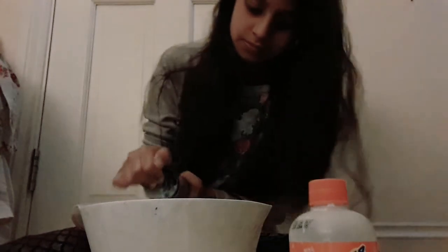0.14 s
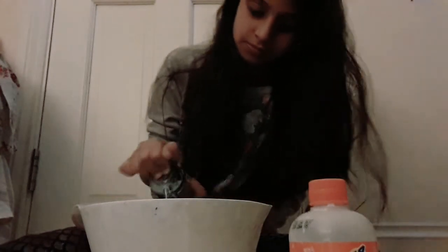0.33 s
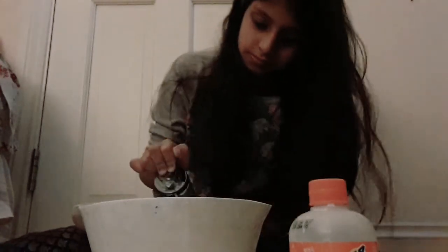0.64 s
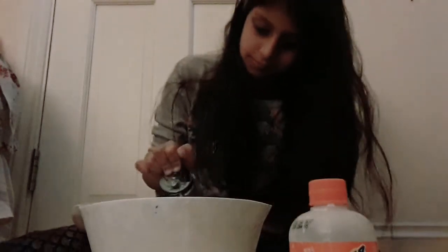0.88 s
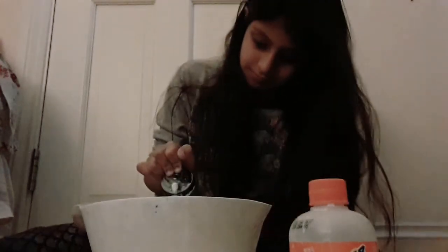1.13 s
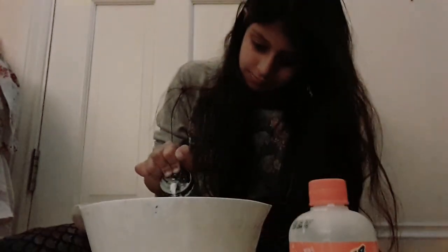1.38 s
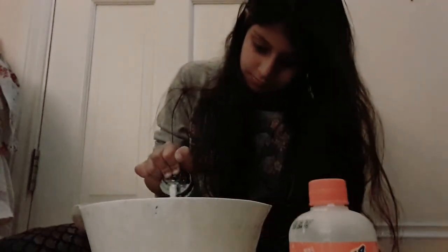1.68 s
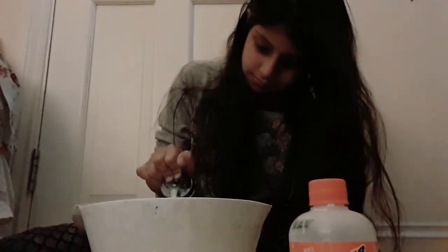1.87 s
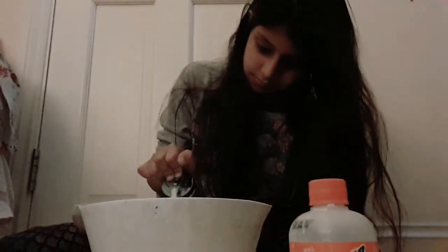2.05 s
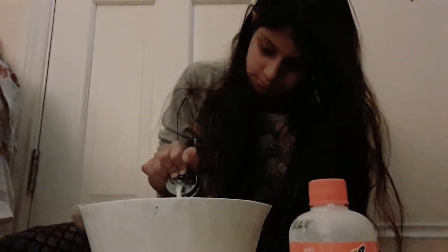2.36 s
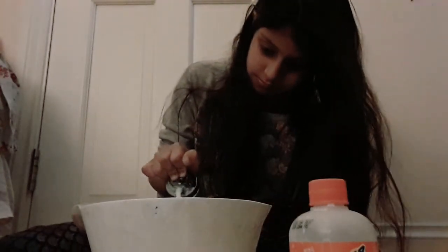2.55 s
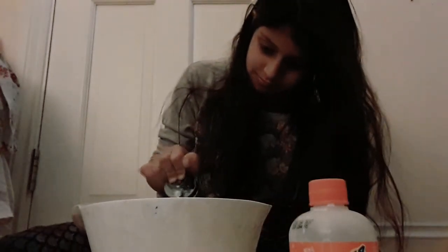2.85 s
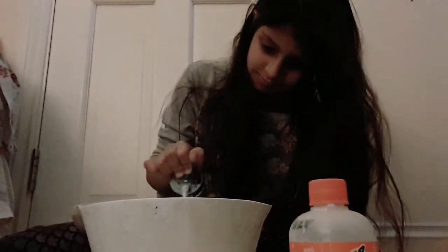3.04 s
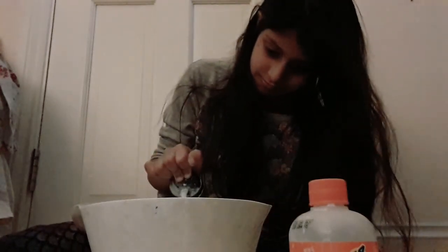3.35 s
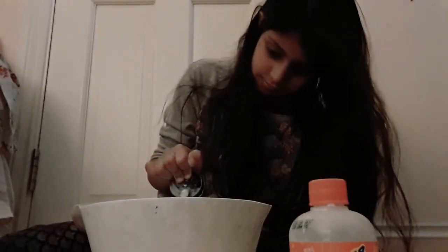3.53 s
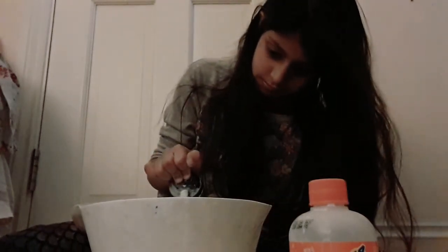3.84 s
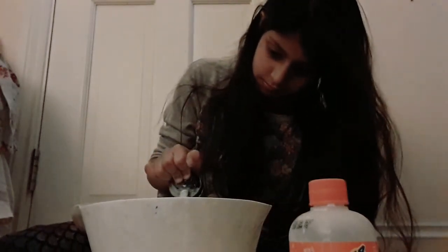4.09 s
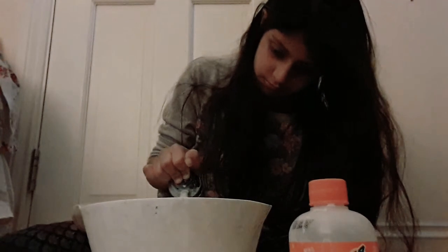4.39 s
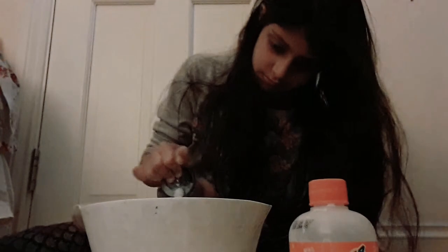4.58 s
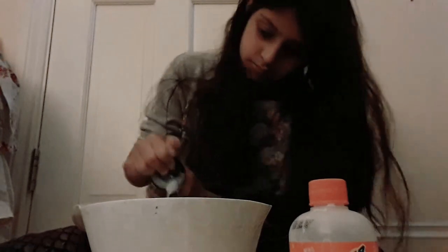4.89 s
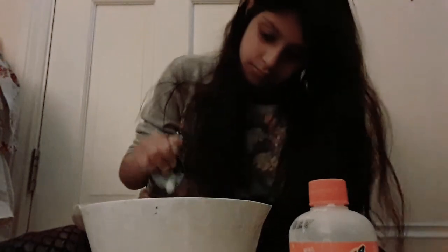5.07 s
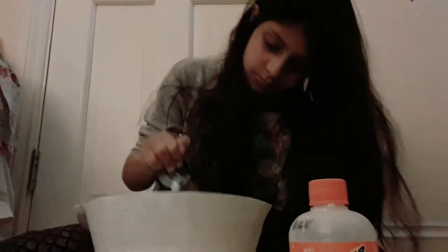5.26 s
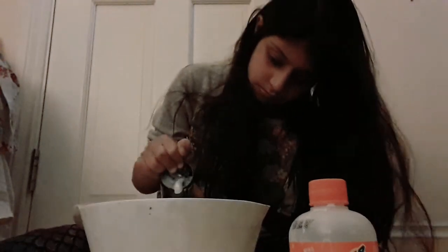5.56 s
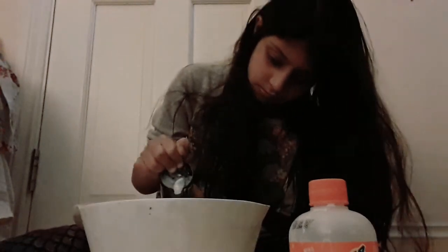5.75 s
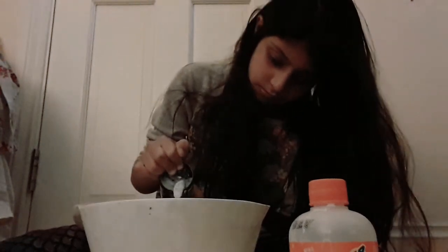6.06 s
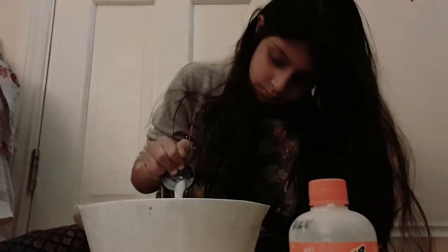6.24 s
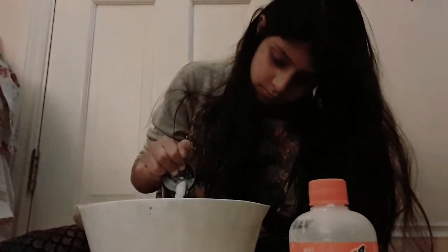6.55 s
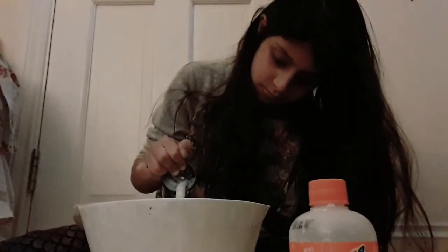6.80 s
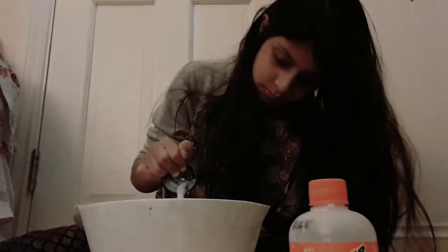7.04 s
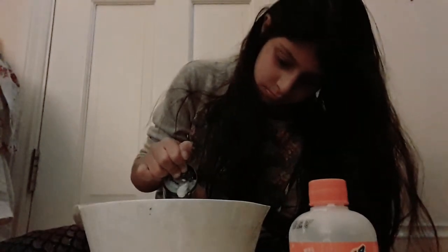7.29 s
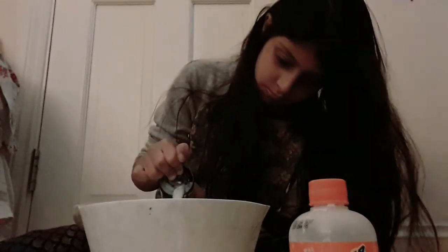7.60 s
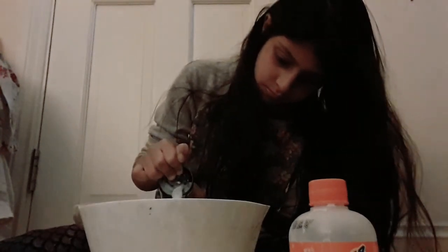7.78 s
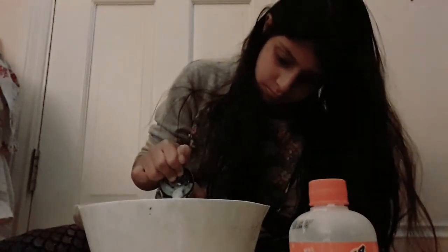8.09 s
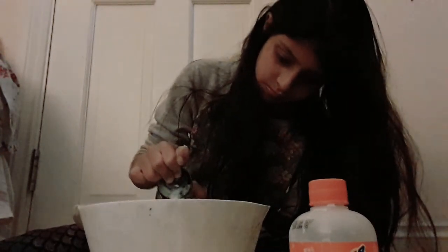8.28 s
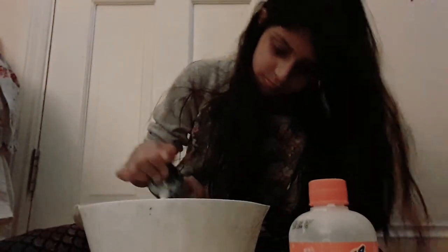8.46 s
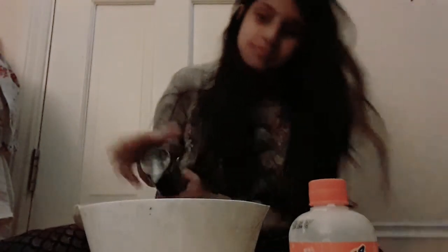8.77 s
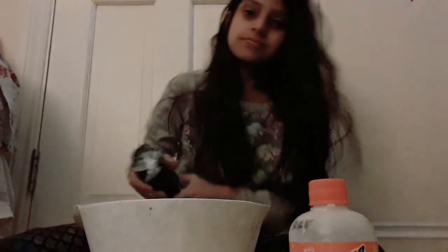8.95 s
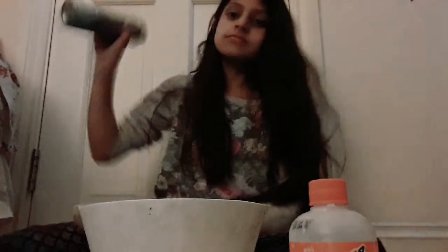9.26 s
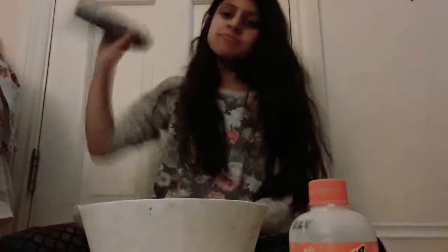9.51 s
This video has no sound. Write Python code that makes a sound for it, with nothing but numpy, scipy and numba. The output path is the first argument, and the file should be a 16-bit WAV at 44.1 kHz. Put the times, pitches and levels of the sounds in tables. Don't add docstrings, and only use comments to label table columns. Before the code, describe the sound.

A nearly empty foam can sputters over a plastic bowl, about an arm's length from a small microphone in a close room. A short hissy spurt ends, then a long rough burst grows gassier. After a pause, hesitant pops build into another spurt, followed by quick taps, tiny dribbling ticks and a last strong burst. Faint cloth rustle and low room rumble remain.

```python
import sys
import numpy as np
from scipy import signal
from scipy.fft import rfft, irfft
from scipy.io import wavfile
from scipy.ndimage import uniform_filter1d
from numba import njit

SR = 44100
rng = np.random.default_rng(int(sys.argv[2]) if len(sys.argv) > 2 else 0)


def field_ratio(decibels):
    return 10 ** (np.asarray(decibels, dtype=float) / 20)


def dump(signal):
    limited = np.clip(np.atleast_2d(signal).T, -1, 1)
    pcm = np.round(limited * 32767).astype(np.int16)
    wavfile.write(sys.argv[1], SR, pcm)


N = 424683


def level(x, db=0):
    return x * field_ratio(db) / np.sqrt(np.mean(x ** 2))


def band(x, lo_hz, hi_hz, order=2):
    edges_hz = [lo_hz, min(hi_hz, .49 * SR)]
    return signal.sosfilt(signal.butter(order, edges_hz, "band", fs=SR, output="sos"), x)


def fade(x, tau_s):
    return signal.lfilter([1], [1, -np.exp(-1 / (tau_s * SR))], x)


def walk(rate):
    hold = int(SR / rate)
    steps = np.repeat(rng.standard_normal(N // hold + 1), hold)
    return uniform_filter1d(steps, hold)[:N]


def add(out, s, x):
    i = int(s * SR)
    out[i:i + len(x)] += x[:len(out) - i]


def law(share_db, base_db, slope):
    return base_db + slope * share_db


def valve():
    # t/s, foam flow level/dB, gas share level/dB, spout f/Hz
    press_end = [(0.0, -32.5, 11.5, 3250), (0.03, -34, 11.5, 3200), (0.2, -34, 11, 3310)]
    press_blip = [
        (0.63, -74.5, 16.4, 2944),
        (0.668, -50, 15.7, 3060),
        (0.7, -42, 14, 3397),
        (0.76, -65.5, 12, 3980),
    ]
    press_long = [(.79, -44.5, -12, 3080), (.85, -29.5, -11, 3770), (.97, -29, -5.5, 3490),
                  (1.269, -27.5, -2, 3656), (1.53, -27.5, -3.5, 3328), (1.63, -24, 1.5, 4270),
                  (1.69, -28.5, 9.5, 3513), (2.0, -31, 12.5, 3700), (2.471, -32, 11.5, 3620)]
    press_slow = [(2.975, -52, -9.5, 3278), (3.02, -42.5, 9.5, 3793), (3.1, -52.5, 10.5, 3700),
                  (3.2, -53, 2.5, 2825), (3.6, -50.5, -5, 2814), (3.85, -47, -5, 3414),
                  (4.201, -39, -2.5, 3350), (4.53, -28.5, 3.5, 3707), (4.66, -41.5, 13, 3235)]
    press_taps = [(5.37, -66, -14, 3100), (5.396, -48, -37, 3140), (5.458, -65.5, -17.5, 3280),
                  (5.464, -45.5, -32, 3377), (5.5, -45.5, 7.5, 3740), (5.562, -64, 0.5, 3649),
                  (5.568, -42, -3.5, 3540), (5.61, -55.5, 17, 3310)]
    press_dribble = [(5.761, -79.5, 8.5, 3000), (6.0, -78.5, 7, 2897), (6.38, -70.5, -5.5, 3000),
                     (6.45, -74.5, -12.5, 3020), (6.66, -71.5, 7, 2860), (6.72, -85.5, 7.5, 2940),
                     (6.95, -83.5, -0.5, 2985)]
    press_last = [(6.97, -79.5, 9, 3020), (7.158, -59, 0, 2939), (7.412, -41.5, -2.5, 3000),
                  (7.52, -34, -11, 3850), (7.535, -28.5, 0, 4170), (7.689, -33, 10.5, 3136),
                  (7.868, -32.5, 11, 3300), (7.97, -40, 14, 2347)]
    jet_aims = [
        11.5,
        -5,
        -0.5,
        -4.5,
        -8.5,
        -3,
        6,
    ]
    open_db_per_s, shut_db_per_s = 1196.5, 295
    settle_db, settle_db_per_s = -37, 62.5
    t = np.arange(N) / SR
    controls = np.array([[-200], [0], [3000], [0], [0]]) * np.ones(N)
    presses = (press_end, press_blip, press_long, press_slow, press_taps, press_dribble, press_last)
    for press, aim_db in zip(presses, jet_aims):
        s, *columns = np.transpose(press)
        curves = [np.interp(t, s, column) for column in columns]
        now = np.array(curves + [np.full(N, aim_db), curves[0]])
        shut_s = np.maximum(t - s[-1], 0)
        now[0] -= open_db_per_s * np.maximum(s[0] - t, 0)
        now[0] -= np.minimum(shut_db_per_s * shut_s, settle_db_per_s * shut_s - settle_db)
        controls = np.where(now[0] > controls[0], now, controls)
    return controls


@njit
def svf(x, hz, q):
    y, b, l = np.empty(len(x)), 0., 0.
    for i in range(len(x)):
        g = np.tan(np.pi * hz[i] / SR)
        v = (b + g * (x[i] - l)) / (1 + g * (g + 1 / q))
        b, l, y[i] = 2 * v - b, l + 2 * g * v, v / q
    return y


def foam_top(x):
    return signal.sosfilt(signal.butter(4, 9070, fs=SR, output="sos"), x)


def path(x):
    # f/Hz, width f/Hz, level/dB
    resonances = [(320, 200, 10), (430, 77, -10), (540, 110, 9.5), (589, 130, 8.5), (900.28, 640, -15),
                  (1295, 89, 8.5), (2099, 160, 10.5), (2560, 130, -2.5), (2900, 300, 8), (3550, 570, -1),
                  (4400, 200, 0), (5300, 500, -1), (8560, 430, 2), (8440, 2600, 13.5)]
    for hz, width, db in resonances:
        w, a = 2 * np.pi * hz / SR, field_ratio(db / 2)
        k = np.sin(w) * width / hz / 2
        middle = -2 * np.cos(w)
        x = signal.lfilter([1 + k * a, middle, 1 - k * a], [1 + k / a, middle, 1 - k / a], x)
    return x


def sputter(spout_db, share_db, spout_hz, aim_db, held_db):
    full_flow_db, pops_per_s, pop_scatter_db = -30, 600, 6.5
    below_db = np.clip(full_flow_db - held_db, 0, 40)
    thin = field_ratio(-.35 * below_db)
    burst = rng.random(N) < pops_per_s * thin * field_ratio(1.8 * walk(60)) / SR
    scatter = np.minimum(rng.exponential(size=N), 1.8)
    size = burst * field_ratio(pop_scatter_db * scatter) / np.sqrt(thin)
    pops = level(size * rng.choice([-1., 1.], N))
    puffs = level(fade(size, 0.0022))
    noise = rng.standard_normal((4, N))

    wobble_hz = np.clip(spout_hz * (1 + 0.06 * walk(60)), 500., 9000.)
    drive = pops + 0.61 * noise[0] * (0.51 + puffs)
    ringing = level(svf(svf(drive, wobble_hz, 3.), wobble_hz, 3.))
    spread_db = .3 * below_db + .4 * np.maximum(share_db, 0) - 6
    spout = foam_top(ringing + field_ratio(spread_db) * level(band(drive, 1100, 4500)))

    clicks = .4 * thin * pops
    gas = foam_top(band(noise[1] * (0.72 + puffs) * field_ratio(0.76 * walk(25)) + clicks, 5200, 8800))
    jet = band(noise[2] * (0.82 + puffs) * field_ratio(2.1 * walk(17)) + clicks, 9800, 15000, order=3)
    boom = band(noise[3] * (8.7 + puffs), 160, 1900)
    bowl = band(noise[3] * (1.8 + puffs), 1950, 3100)
    layers = [(spout, 0),
              (bowl, law(share_db, -16.5, 0.53)),
              (gas, law(share_db, -4.5, 1.1)),
              (jet, law(share_db, -32.5, 2.35) + aim_db),
              (boom, law(share_db, -21.5, 0.42) + 0.54 * below_db)]
    return sum(level(path(x)) * field_ratio(spout_db + db - 0.5) for x, db in layers)


def swell(hz):
    rise_s = 0.0033 * (3000 / hz) ** 3
    t = np.arange(int(.02 * SR)) / SR
    rise = np.sin(np.pi / 2 * np.minimum(t / rise_s, 1)) ** 2
    return t, rise * np.exp(-np.maximum(t - rise_s, 0) / 0.0018)


def spits(share_db):
    # t/s, peak level/dB, ring f/Hz
    spits_long = [(0.849, -14.5, 3620), (0.9184, -25, 3700), (0.9839, -16.5, 3720), (1.0014, -17.5, 3210),
                  (1.0179, -16.5, 3350), (1.0459, -12.5, 3480), (1.0752, -13, 3480), (1.1505, -14, 3670),
                  (1.173, -21.5, 3290), (1.224, -20.5, 3320), (1.2368, -16.5, 3600), (1.4204, -13.5, 3420),
                  (1.4638, -14, 3340), (1.5044, -18.5, 3010), (1.6291, -10, 4430), (1.6929, -17, 3460),
                  (1.7327, -17, 3290), (1.7487, -13.5, 4150), (1.7688, -16, 4870), (1.801, -19, 3250),
                  (1.9492, -19.5, 4890), (1.9634, -12.5, 3770), (1.9837, -10.5, 3880),
                  (2.0016, -17.5, 3460), (2.1036, -12, 3680), (2.1697, -14, 4100), (2.281, -17, 3690),
                  (2.3213, -17, 3620), (2.3777, -19.5, 3890), (2.4416, -18.5, 3140)]
    spits_slow = [(2.977, -39, 3470), (2.98, -33.5, 2910), (3.0063, -23, 3660), (3.061, -23.5, 4890),
                  (3.115, -32, 3770), (3.144, -33, 2730), (3.193, -31.5, 4860), (3.2279, -25.5, 3225),
                  (3.2459, -19, 2940), (3.2954, -30, 2980), (3.3206, -30.5, 2750), (3.3636, -33.5, 2950),
                  (3.497, -31.5, 2900), (3.64, -32, 2797), (3.746, -29, 2970), (3.8464, -24.5, 3260),
                  (3.9518, -25, 4640), (4.0912, -15, 4770), (4.143, -21, 2870), (4.192, -18, 3660),
                  (4.2866, -12.5, 3690), (4.3207, -15, 3740), (4.3596, -33, 3820), (4.3819, -15.5, 2860),
                  (4.4268, -16, 3615), (4.505, -17.5, 2875), (4.5453, -10.5, 4000), (4.563, -15.5, 3610),
                  (4.618, -16.5, 2855), (4.653, -23.5, 3130)]
    spits_dribble = [(5.3693, -61, 2900), (5.378, -53.5, 3360), (5.3917, -32.5, 3200), (5.439, -40, 3000),
                     (5.4664, -28, 3210), (5.496, -28.5, 4580), (5.5708, -31.5, 3020),
                     (5.8741, -64.5, 2810), (5.9528, -61.5, 3000), (5.9714, -53, 2820), (6.05, -51.5, 2930),
                     (6.083, -46.5, 2880), (6.162, -43, 2870), (6.2264, -57, 2800), (6.2627, -51, 3110),
                     (6.2885, -47, 3130), (6.335, -66, 3000), (6.36, -38, 3030), (6.386, -40, 3090),
                     (6.4555, -56, 2880), (6.5812, -60, 2880), (6.6177, -53.5, 2830)]
    spits_last = [(6.958, -70, 2860), (6.9823, -59, 2970), (6.9986, -52, 3020), (7.0185, -67, 2760),
                  (7.0501, -64, 2880), (7.071, -48.5, 3100), (7.093, -48, 3060), (7.122, -39.5, 2970),
                  (7.143, -45, 3000), (7.1631, -28, 2940), (7.199, -35.5, 3120), (7.2478, -32, 2980),
                  (7.269, -35, 2940), (7.293, -34, 2860), (7.307, -31, 2930), (7.336, -34.5, 2950),
                  (7.337, -30, 3000), (7.362, -28, 3080), (7.3735, -29, 2950), (7.3876, -32, 2900),
                  (7.4066, -33, 3040), (7.4162, -25, 4360), (7.4414, -19, 3000), (7.4774, -23, 4100),
                  (7.5051, -26, 4340), (7.5299, -25, 4080)]
    spits_full = [(7.5294, -16, 4170), (7.614, -17.5, 2890), (7.6401, -12.5, 4260), (7.666, -23, 2890),
                  (7.7083, -24, 2980), (7.7292, -17, 3004), (7.7886, -14.5, 4530), (7.8592, -13, 4430),
                  (7.913, -32.5, 2916)]
    spits_small = [(3.3428, -38, 2780), (3.3917, -31, 2800), (3.4376, -54, 2830), (3.4595, -52, 2940),
                   (3.4765, -45, 2790), (3.5389, -38, 2920), (3.5638, -36, 2990), (3.6207, -49, 2800),
                   (3.696, -47, 2860), (3.7179, -46, 3470), (3.7594, -30, 3720), (3.7818, -34, 3720),
                   (3.8806, -26, 3400), (3.8985, -40, 3600), (3.916, -45, 3140), (3.9429, -36, 2900),
                   (3.9644, -23.5, 3020), (3.9833, -34, 2860), (3.9993, -25, 3100), (4.0467, -29.5, 3060)]
    spits_early = [(1.271, -13.5, 3390), (1.3528, -22.5, 3190), (1.3656, -22.5, 3300),
                   (1.5198, -16.5, 2910), (1.5782, -14, 3860), (1.6106, -9.5, 4470)]
    spits_late = [(7.5601, -12.5, 4490), (7.5913, -17, 2933), (7.7684, -20.5, 2920), (7.8117, -20, 2980),
                  (7.865, -20, 2888)]
    # t/s, peak level/dB
    gusts_sharp = [(0.8533, -13.5), (1.0189, -21), (1.044, -13.5), (1.0799, -13.5), (1.3187, -6),
                   (1.3307, -6), (1.3542, -14.5), (3.014, -30), (3.0641, -13.5), (3.2444, -39),
                   (3.9988, -21.5), (4.039, -26), (4.0909, -21.5), (4.1487, -20.5), (4.1934, -14),
                   (5.497, -42), (5.573, -35), (5.6032, -23.5), (6.999, -46.5), (7.1616, -36),
                   (7.2963, -32.5), (7.3493, -31)]
    # t/s, peak level/dB
    gusts_end = [(0.0358, -11.5), (0.0962, -9.5), (0.1186, -11), (0.1361, -10), (0.178, -13.5),
                 (0.2024, -12.5)]
    gusts_long = [(1.4083, -24.5), (1.4208, -19.5), (1.4547, -21), (1.4667, -17), (1.5051, -17),
                  (1.5191, -12.5), (1.539, -15), (1.5535, -13.5), (1.5705, -14), (1.5964, -11.5),
                  (1.6169, -8.5), (1.6473, -10.5), (1.6623, -10.5), (1.7321, -7), (1.7521, -9.5),
                  (1.7825, -6.5), (1.8019, -8), (1.8488, -4.5), (1.8678, -5.5), (1.8763, -4.5),
                  (1.9117, -6.5), (1.9676, -9), (1.988, -8), (2.002, -4.5), (2.0384, -6), (2.0648, -6),
                  (2.0873, -5), (2.1277, -6), (2.1462, -5.5), (2.1801, -11.5), (2.203, -7), (2.236, -9.5),
                  (2.2479, -9.5), (2.2814, -8.5), (2.3188, -4.5), (2.3442, -8), (2.3851, -10.5),
                  (2.4026, -10), (2.443, -7.5), (2.4649, -1.5)]
    gusts_slow = [(4.2438, -27.5), (4.2902, -24), (4.3146, -26), (4.3391, -18.5), (4.3515, -14),
                  (4.4044, -19.5), (4.4214, -20), (4.4403, -20.5), (4.4618, -12), (4.4877, -15),
                  (4.5132, -12.5), (4.5496, -15.5), (4.6274, -12), (4.6578, -14.5)]
    gusts_last = [(7.5044, -39), (7.5313, -22.5), (7.5425, -26), (7.5637, -19.5), (7.5827, -14.5),
                  (7.6256, -8.5), (7.648, -13.5), (7.6615, -13), (7.6874, -12.5), (7.7044, -11),
                  (7.7523, -9), (7.7822, -13), (7.8107, -9.5), (7.9182, -10.5), (7.9548, -10.5)]
    pop, crack, slap, gust, surge = np.zeros((5, N))
    impulse = np.ones(1)
    pockets = spits_long + spits_slow + spits_dribble + spits_last
    pockets = pockets + spits_full + spits_small + spits_early + spits_late
    for s, db, hz in pockets:
        t, shape = swell(hz)
        add(pop, s - .001, field_ratio(db - 5.0) * shape * np.sin(2 * np.pi * hz * t))
        add(slap, s - .001, field_ratio(db) * shape)
        add(crack, s, field_ratio(db) * impulse)
    soft = np.hanning(int(.009 * SR)) / (0.003 * SR)
    for s, db in gusts_end + gusts_long + gusts_slow + gusts_last:
        add(surge, s - .002, field_ratio(db - 6.5) * soft)
    for s, db in gusts_sharp:
        add(gust, s, field_ratio(db - 13) * impulse)

    puff = crack * field_ratio(law(share_db, -13, 0.99))
    noise = rng.standard_normal((3, N))
    wet = level(path(band(noise[0], 1950, 4700))) * slap
    hiss_shape = fade(puff, 0.0018) + 0.17 * fade(puff, 0.012)
    hiss = level(path(band(noise[1], 6200, 9800, order=3))) * hiss_shape
    gas_shape = fade(gust, .01) + 1.2 * fade(gust, 0.002) + fade(surge, 0.0038)
    gas = level(path(band(noise[2], 5400, 9700))) * gas_shape
    air = level(band(noise[0], 9500, 15000)) * fade(gust + .5 * surge, .003)
    muffled = foam_top(field_ratio(-10.5) * wet + field_ratio(-19) * hiss + gas)
    return pop + muffled + field_ratio(-27.5) * hiss + field_ratio(-27) * air


def ring(hz, t60_s, cycles_in=0.83):
    t = np.arange(int(t60_s * SR)) / SR
    return np.sin(2 * np.pi * hz * t) * field_ratio(-60 * t / t60_s) * np.minimum(t * hz / cycles_in, 1)


def knocks():
    # t/s, peak level/dB, f/Hz, t60/s
    taps = [(0.212, -27.5, 554, 0.032), (2.621, -56, 1170, 0.024), (5.638, -49.5, 202.1, 0.054),
            (6.384, -58, 1565, 0.033), (6.628, -57, 201, 0.061), (8.288, -60.5, 204, 0.056),
            (8.63, -57, 323.4, 0.05)]
    out = np.zeros(N)
    for s, db, hz, t60_s in taps:
        t60_s = max(t60_s, .01)
        tone = ring(hz, t60_s)
        scuff = band(rng.standard_normal(4096), 150, 2070.7)[-len(tone):]
        scuff = scuff * field_ratio(-60 * np.linspace(0, 1, len(tone)))
        add(out, s, field_ratio(db + 3.5) * (tone + 1.2 * scuff + ring(hz * 0.427, t60_s)))
    return out


def rustles():
    # t/s, length t/s, level/dB
    slides = [(2.606, 0.093, -59), (6.598, 0.071, -66.5), (8.284, .02, -67.5), (8.31, 0.13, -71),
              (8.528, .12, -73.5), (8.604, 0.098, -66), (8.664, 0.26, -64), (8.978, 0.208, -67.5),
              (9.24, 0.075, -78), (9.41, 0.1, -82), (9.608, 0.092, -65)]
    shape = np.zeros(N)
    for s, length_s, db in slides:
        add(shape, s, field_ratio(db) * np.hanning(int(length_s * SR)) ** 0.37)
    noise = rng.standard_normal((2, N)) * field_ratio(1.3 * walk(50))
    bright = level(path(band(noise[0], 6800, 9140)))
    dull = level(path(band(noise[1], 910, 2100, order=1)), -8.5)
    return shape * (bright + dull)


def room(x):
    low_t60_s, treble_t60_s, tail_db = 0.21, 0.15, -6.5
    t = np.arange(int(.35 * SR)) / SR
    low, high = rng.standard_normal((2, len(t)))
    tail = band(low, 71, 4100) * field_ratio(-60 * t / low_t60_s)
    tail = tail + band(high, 4472, 20000) * field_ratio(-60 * t / treble_t60_s)
    tail = tail * np.minimum(t / 0.0042, 1) ** 2
    unit_tail = tail / np.sqrt(np.sum(tail ** 2))
    return x + field_ratio(tail_db) * signal.fftconvolve(x, unit_tail)[:N]


def hum_band(hz, width_hz, db):
    return level(band(rng.standard_normal(N), hz - width_hz / 2, hz + width_hz / 2, order=1), db)


def background():
    # f/Hz, density level/dB
    room_tone = [(14, -17.5), (45, -10.5), (230, -11), (480, -22.5), (2000, -35), (5200, -53.5),
                 (8400, -37), (11000, -59.5)]
    # f/Hz, width f/Hz, level/dB
    hum_lines = [(87, 13, -7), (106, 5.5, -1.5), (186, 14, -1.5), (250, 18, -7)]
    # middle t/s, length t/s, level/dB, f/Hz
    hum_swells = [(.1, 0.56, -63, 130), (2, 0.98, -66, 100.4), (3.3, 0.43, -67, 105), (3.995, 1, -62.5, 80),
                  (5.302, 0.71, -77.5, 107), (5.6, 0.97, -65, 183), (6.3, .7, -62, 104.4),
                  (7.05, .3, -65.5, 69.3), (7.597, 0.9, -66, 100.4), (8.402, .9, -65, 186),
                  (9.402, 0.98, -68, 100.9)]
    t = np.arange(N) / SR
    hz = np.maximum(np.arange(N // 2 + 1) * SR / N, 1)
    at_hz, at_db = np.transpose(room_tone)
    shape = field_ratio(np.interp(np.log(hz), np.log(at_hz), at_db))
    tone = irfft(rfft(rng.standard_normal(N)) * shape, N)
    out = level(tone, -64) + level(sum(hum_band(*line) for line in hum_lines), -69)
    for s, length_s, db, f in hum_swells:
        out += hum_band(f, 10, db) * np.exp(-(2 * (t - s) / length_s) ** 2)
    return out


def scene():
    flow_db, share_db, spout_hz, aim_db, held_db = valve()
    can = sputter(flow_db, share_db, spout_hz, aim_db, held_db) + spits(share_db)
    return (room(can + rustles()) + knocks() + background())[None]


def low_pass(x):
    return signal.sosfilt(signal.butter(12, 15660, fs=SR, output="sos"), x)


def record(dry):
    mix = np.tanh(dry / .9) * 0.91
    return low_pass(mix)


dry = scene()
out = record(dry)
dump(out)
```